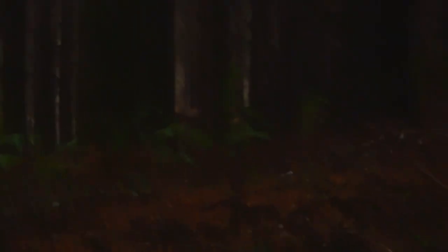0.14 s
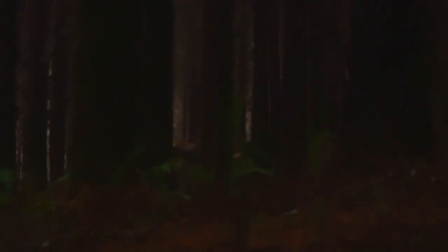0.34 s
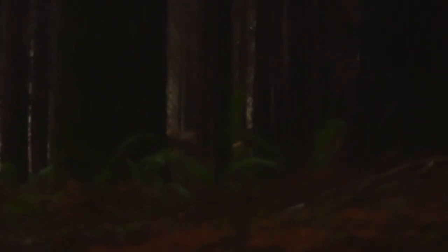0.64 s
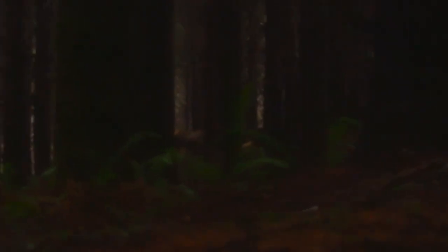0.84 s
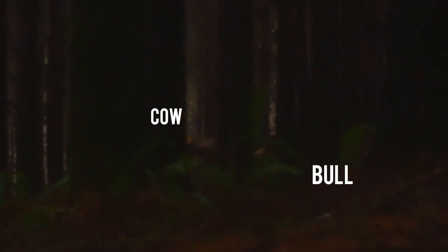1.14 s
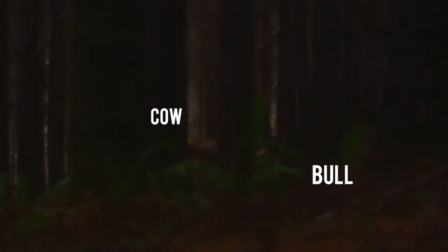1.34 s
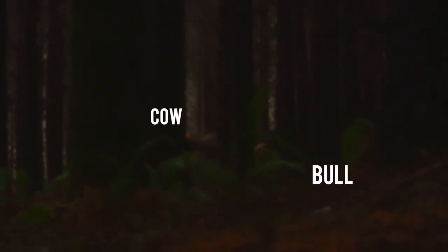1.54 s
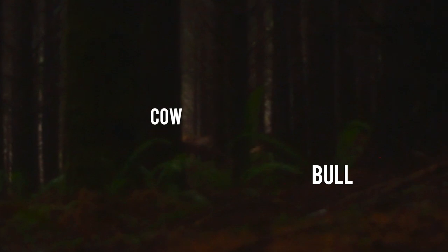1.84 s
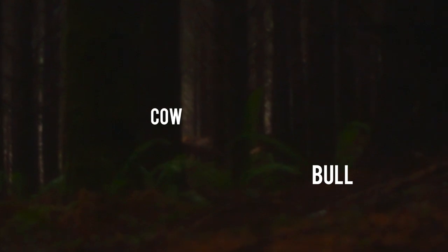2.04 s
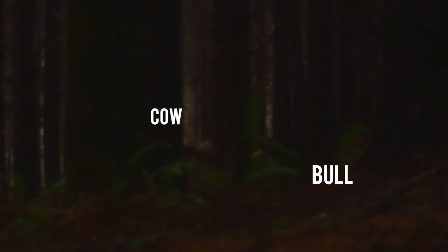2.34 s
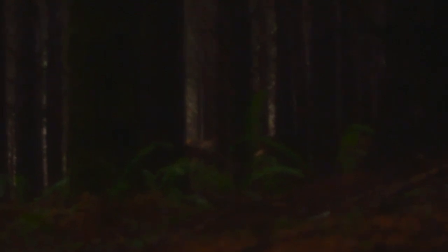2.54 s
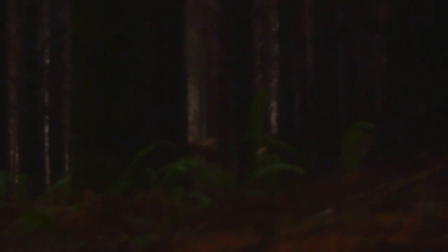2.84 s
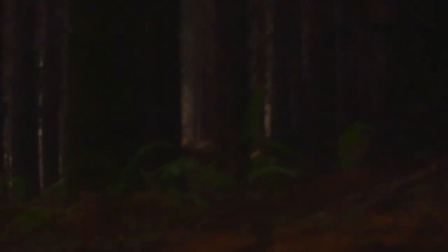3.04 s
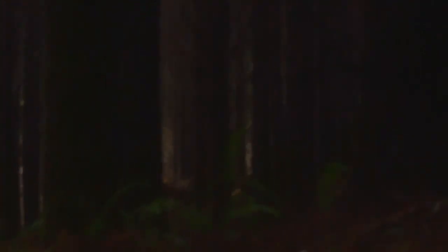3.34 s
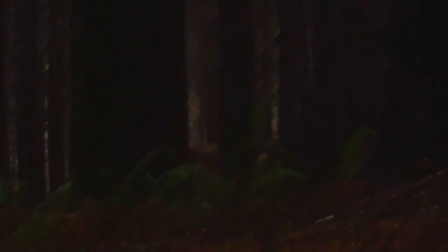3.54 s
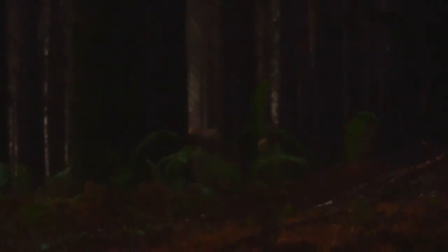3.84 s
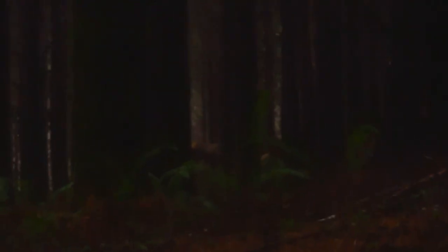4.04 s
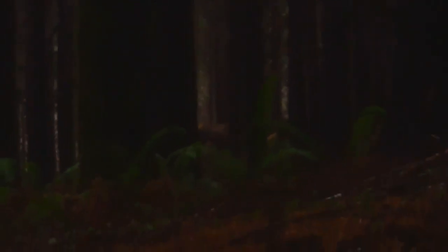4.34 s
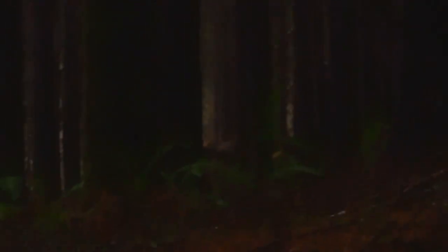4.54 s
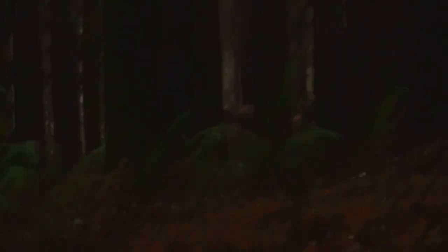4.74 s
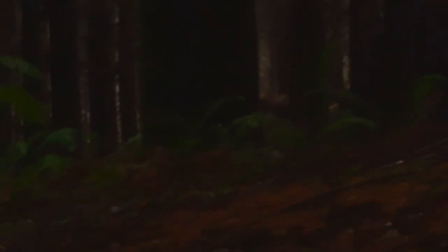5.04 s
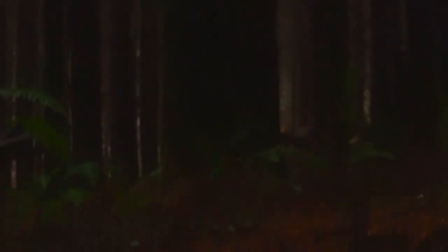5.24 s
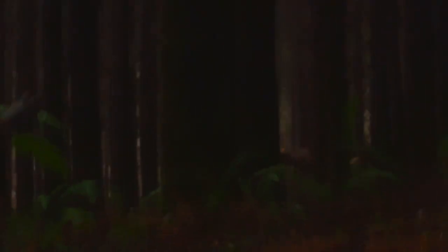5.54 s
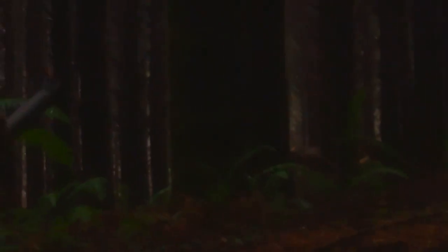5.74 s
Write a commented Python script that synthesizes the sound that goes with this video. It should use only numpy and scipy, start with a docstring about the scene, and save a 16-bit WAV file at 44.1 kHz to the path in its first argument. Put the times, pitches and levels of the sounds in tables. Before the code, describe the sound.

Close, irregular raindrops tap on clothing and tick on the forest floor throughout, with farther rain blurring into a gentle hiss. The hand holding the microphone adds a low, wavering rumble and one soft thump just after the start. Cloth rustles faintly a few times and a thin, high bird whistle barely comes through midway, while the patter continues evenly among the trees.

```python
"""Light rain in a conifer forest, heard from a hand-held camera. From the start, drops pat on a jacket
and tick brightly close by over the hiss of far rain, while the trembling hand makes the microphone rumble.
Almost at once cloth rustles and a wet strap squeaks, and at 0.65 s the camera takes one hard bump among
several faint ones. The cloth rustles again near 1.2 s, a small bird whistles thinly from 2 s,
and a last rustle comes near 3 s. The rain goes on to the end."""
import sys
import numpy as np
from scipy import signal
from scipy.fft import rfft, irfft, next_fast_len
from scipy.io import wavfile
from scipy.ndimage import uniform_filter1d, map_coordinates

SR = 44100
rng = np.random.default_rng(int(sys.argv[2]) if len(sys.argv) > 2 else 0)


def inscribe(sig):
    """Save sig as 16-bit PCM at rate SR to the path in sys.argv[1].

    A 1-D sig is mono; a 2-D sig holds one channel per row.
    Samples are clipped to [-1, 1] before scaling.
    """
    pcm = np.round(np.clip(np.atleast_2d(sig).T, -1, 1) * 32767)
    wavfile.write(sys.argv[1], SR, pcm.astype(np.int16))


N = 259299


def jacket_pats():
    """Dull pats of only a few vibrations each, nearly all from drops landing on cloth."""
    # The loudest pats; the three between 0.14 and 0.2 s are short catches in the strap's squeak.
    # Each row: start in seconds, level in dB, pitch in Hz, seconds to fade by 60 dB.
    big_pats = [(.0937, -21.5, 1330, 0.0083), (.1443, -36, 1435, .015), (.1792, -32, 1316, .03),
                (.1903, -27.5, 1330, 0.013), (.3022, -39, 1150, 0.011), (.3156, -40, 700, .019),
                (.3967, -32, 670, .0044), (.4584, -41, 950, .011), (.5737, -33, 760, 0.0084),
                (.6493, -28, 453, 0.018), (.6536, -35, 940, .0075), (.6727, -34.5, 1015, .017),
                (.9479, -27.5, 1220, 0.0032), (1.0113, -32, 2090, 0.0026), (1.1111, -38, 1180, 0.0057),
                (1.1348, -25, 2050, 0.0032), (1.177, -23.5, 2010, 0.0032), (1.1869, -35, 1170, 0.0076),
                (1.2038, -26, 2000, 0.0042), (1.2732, -20, 790, 0.0055), (1.2993, -34, 1160, .009),
                (1.3195, -18.5, 930, 0.0017), (1.3332, -19, 1090, 0.0029), (1.3776, -33.5, 1560, 0.0037),
                (1.4659, -35, 960, 0.0065), (1.591, -32, 1990, 0.0026), (1.6699, -18, 763, 0.0056),
                (1.7379, -38, 2130, .01), (1.7545, -17, 1276, 0.0018), (2.0345, -29, 800, 0.0041),
                (2.0651, -35, 2340, 0.004), (2.1094, -35, 1130, .0063), (2.169, -28.5, 725, 0.0092),
                (2.1788, -31.5, 1390, 0.0073), (2.2468, -33, 790, .0077), (2.29, -26.5, 800, 0.006),
                (2.5932, -31.5, 1860, 0.0025), (2.653, -34, 620, 0.0066), (2.6692, -30.5, 1300, 0.0016),
                (2.8656, -32.5, 1160, .0054), (2.8876, -32.5, 390, .011), (2.9362, -33.5, 940, 0.01),
                (2.9647, -33, 1015, 0.0035), (2.9808, -28.5, 1110, 0.0089), (2.9925, -20.5, 894, 0.0057),
                (3.0879, -28, 1230, 0.0065), (3.2837, -30.5, 1740, 0.0032), (3.3274, -32, 1040, 0.007),
                (3.3835, -30.5, 900, 0.0053), (3.4499, -26, 970, .0051), (3.4807, -29, 1270, 0.0041),
                (3.62, -34.5, 1473, 0.0078), (3.6356, -25, 1130, 0.0014), (3.7014, -29, 654, 0.0042),
                (3.9354, -32.5, 1230, 0.0083), (3.9794, -26, 2160, 0.00096), (3.9975, -21.5, 880, 0.0051),
                (4.1268, -28, 790, 0.0036), (4.1562, -32, 890, .0039), (4.2105, -22, 1110, 0.004),
                (4.3288, -36.5, 685, 0.011), (4.3552, -33.5, 1020, 0.0067), (4.4085, -35.5, 1090, 0.0043),
                (4.4489, -32.5, 1170, 0.016), (4.5392, -29.5, 840, 0.0061), (4.6127, -22.5, 1040, 0.0033),
                (4.6252, -25.5, 773, 0.007), (4.7818, -23.5, 1090, 0.0062), (4.8804, -40, 1610, .009),
                (4.9052, -31, 2200, 0.0049), (5.158, -31.5, 1040, .004), (5.2222, -28, 840, .0046),
                (5.5642, -25.5, 960, 0.0094), (5.6335, -22, 836, 0.0025), (5.7869, -34.5, 1550, 0.0048)]
    small_pats = shower(count=750, db=-52, spread_db=4.5, hz=1132, octaves=0.9, cycles=2.8)
    pats = taps(np.vstack([big_pats, small_pats]), samples=900, sag=0.14, rise_cycles=0.088,
                looseness=0.8, splash_db=-11, splash_s=0.023)
    return band_limited(pats, low_hz=173, high_hz=10200)


def bright_ticks():
    """Short, bright ticks of raindrops, some alone and some the sharp top of a pat."""
    # The loudest ticks. Each row: start in seconds, level in dB, pitch in Hz.
    loud_ticks = [(0.095, -36.5, 5340), (.2612, -35, 6800), (.3024, -26.5, 4930), (.355, -35, 4520),
                  (0.3987, -32.5, 7300), (0.5738, -21.5, 7380), (.6373, -26.5, 5930), (.7013, -32, 7000),
                  (.7099, -35.5, 10290), (0.7499, -27, 6800), (.7646, -30.5, 8300), (0.7974, -29.5, 8200),
                  (0.866, -25.5, 8900), (1.0113, -26, 5040), (1.1236, -34, 7400), (1.187, -25.5, 12000),
                  (1.2917, -25, 6400), (1.3185, -22, 4130), (1.3772, -28.5, 6470), (1.4547, -30, 10000),
                  (1.4653, -30, 8350), (1.4772, -21.5, 8800), (1.5328, -26.5, 8900), (1.6765, -32.5, 6900),
                  (1.7375, -35, 8170), (1.7545, -27, 4120), (1.8467, -33, 7990), (1.9, -30.5, 7820),
                  (2.109, -29.5, 8540), (2.158, -26, 10200), (2.1793, -26, 5480), (2.1843, -33, 9030),
                  (2.2207, -33, 6600), (2.2882, -30.5, 10720), (2.3389, -24.5, 6170), (2.35, -32, 8150),
                  (2.3748, -31, 9500), (2.4678, -31.5, 8600), (2.5404, -32.5, 7900), (2.5933, -25.5, 7100),
                  (2.6532, -28, 6460), (2.6627, -30, 6500), (2.67, -22, 7520), (2.9003, -33, 9140),
                  (2.9256, -28, 9040), (2.9808, -32.5, 6600), (2.9928, -32, 5540), (3.0098, -28, 11800),
                  (3.0614, -26, 5830), (3.136, -25, 8400), (3.2723, -29, 8450), (3.3132, -28, 11100),
                  (3.3303, -31.5, 9240), (3.4594, -29.5, 11700), (3.502, -26.5, 10400),
                  (3.5204, -34, 10400), (3.5749, -34, 9800), (3.6194, -33, 9370), (3.6911, -30, 7860),
                  (3.7475, -27, 10800), (3.895, -27, 10600), (3.9354, -26, 10200), (3.9793, -29, 4840),
                  (3.9981, -29, 7500), (4.1196, -26, 9660), (4.1272, -27.5, 8650), (4.1537, -29, 7770),
                  (4.1757, -28.5, 6920), (4.1977, -33.5, 9000), (4.3285, -28, 9800), (4.3541, -32.5, 8240),
                  (4.539, -24.5, 6960), (4.5488, -37, 7900), (4.5809, -29.5, 8800), (4.7112, -31, 7500),
                  (4.733, -38, 9100), (4.7613, -31, 10430), (4.7828, -45, 4900), (4.905, -26.5, 5120),
                  (4.9343, -32, 9200), (5.0333, -23.5, 8600), (5.0901, -28, 9200), (5.158, -29.5, 6460),
                  (5.2217, -34, 4660), (5.369, -25, 10530), (5.458, -34, 6850), (5.5644, -33, 6770),
                  (5.7492, -35, 8550), (5.787, -26.5, 7370), (5.8347, -34, 10300)]
    contact_s, ring_cycles = 0.0017, 12  # a tick rings this many cycles beyond the shortest contact
    big_ticks = [(s, db, hz, contact_s + ring_cycles / hz) for s, db, hz in loud_ticks]
    small_ticks = shower(count=1800, db=-50.5, spread_db=3.5, hz=7500, octaves=0.6, cycles=13.4)
    ticks = taps(np.vstack([big_ticks, small_ticks]), samples=600, sag=0.034, rise_cycles=0.83,
                 looseness=2.07, splash_db=-13.5, splash_s=0.026)
    return band_limited(ticks, low_hz=1340, high_hz=19900)


def shower(count, db, spread_db, hz, octaves, cycles):
    """Rows for many small drops that fall at random moments; the louder ones are rare."""
    moment, chance = rng.random((count, 2)).T
    level_db = db - spread_db * np.log(chance * 0.84 + 0.023)
    pitch = np.clip(hz * 2 ** (octaves * rng.standard_normal(count)), 150, 15000)
    fade_s = cycles / pitch + 0.0037
    return np.column_stack([moment * N / SR, level_db, pitch, fade_s])


def taps(rows, samples, sag, rise_cycles, looseness, splash_db, splash_s):
    """Each pat or tick rings briefly at an unsteady pitch and trails off in a splashy scatter."""
    start_s, db, hz, fade_s = np.transpose(rows)[:, :, None]
    t = np.arange(samples) / SR
    jitter = uniform_filter1d(rng.standard_normal((len(rows), 2, samples)), size=3)
    wander = np.cumsum(jitter, axis=2) * np.sqrt(hz / SR)[:, None]
    cycles = (1 - sag) * hz * t + sag * (1 - np.exp(-2 * hz * t))  # pitch sags as the contact spreads
    ring = np.sin(2 * np.pi * cycles + looseness * wander[:, 0])
    ring *= amp(-60 * t / np.clip(fade_s, 1e-3, 1))
    ring *= 1 - np.exp(-t * hz / rise_cycles)
    ring /= np.abs(ring).max(axis=1, keepdims=True)
    splash = np.sin(2 * np.pi * hz * t + 2.6 * wander[:, 1])
    splash *= amp(splash_db - 60 * t / splash_s) * (1 - np.exp(-t / 0.00014))
    positions = np.round(start_s * SR).astype(int) + np.arange(samples)
    return np.bincount(positions.ravel(), (amp(db) * (ring + splash)).ravel(), N + samples)[:N]


def band_limited(x, low_hz, high_hz):
    """Pats and ticks keep little sound below low_hz, and their treble softens above high_hz."""
    return filtered(x, lambda f: (1j * f / (low_hz + 1j * f)) ** 2 / (1 + 1j * f / high_hz))


def far_rain():
    """Countless drops blur into a fluttering hiss; heavier rain swells its low part most."""
    # How hard it rains. Each row: time in seconds, relative strength in dB.
    strength = [(0.0, -51), (0.26, -46), (0.62, -49), (2.05, -51), (2.24, -48), (2.6, -50), (4.05, -49),
                (4.13, -51), (4.91, -50), (5.88, -50)]
    # The rain's low wash and its high hiss. Each row: frequency in Hz, relative level in dB.
    wash_colour = [(35, -41), (60, -9), (81, -21), (102, -16.5), (367, -25.5), (935, -28.5), (2500, -33.5),
                   (3250, -57), (5500, -120)]
    hiss_colour = [(1200, 6), (2000, -2.5), (3000, 6), (4500, 1.5), (8400, 2.5), (10500, -6.5), (13000, -4),
                   (15000, -15), (15900, -9)]
    rain_db, = curves(strength)
    swell_db = rain_db - rain_db.mean()
    wash = amp(-52 + 1.4 * swell_db + 1.08 * wobble(12)) * noise(wash_colour)
    hiss = amp(-55.5 + 0.68 * swell_db + 0.31 * wobble(25)) * noise(hiss_colour)
    return wash + hiss


def hand_rumble():
    """The hand sways slowly and trembles fast, shaking the microphone into a deep rumble."""
    # How much the hand shakes. Each row: time in seconds, sway level in dB, tremor level in dB.
    shaking = [(0.0, -36.5, -27.5), (0.62, -24, -33), (0.65, -23.5, -43), (0.87, -35.5, -31),
               (0.93, -21, -32), (2.36, -33.5, -35.5), (2.39, -29, -24.5), (2.5, -20, -32),
               (2.93, -42, -34.5), (3.01, -31, -28.5), (3.72, -21, -36.5), (3.85, -41, -29),
               (3.96, -24, -35), (4.81, -33.5, -26), (5.01, -23.5, -23.5), (5.62, -25.5, -36.5),
               (5.83, -22, -24), (5.88, -19, -33)]
    # The slow sway and the fast tremor. Each row: frequency in Hz, relative level in dB.
    sway_colour = [(4, -42), (8, -11.5), (14, 3), (20, -4.5), (24, -54)]
    tremor_colour = [(17, -24), (21, 0), (27, -1), (33, -3), (39, -9), (47, -19), (56, -30), (75, -40)]
    sway_db, tremor_db = curves(shaking)
    return amp(sway_db) * noise(sway_colour) + amp(tremor_db) * noise(tremor_colour)


def camera_bumps():
    """Each bump rings the camera's soft grip until the hand abruptly damps it."""
    # Knocks on the camera body. Each row: start in seconds, peak level in dB, pitch in Hz.
    bumps = [(0.2444, -37, 143), (0.309, -42, 132), (.329, -41, 200), (.398, -44, 149), (0.651, -9, 106.6),
             (2.887, -34, 145), (3.608, -41, 124), (3.697, -44, 173), (4.3, -37, 184), (4.989, -41, 115),
             (5.511, -36.5, 107)]
    out, t = np.zeros(N), np.arange(SR // 8) / SR
    for start_s, db, hz in bumps:
        ring_cycles = 6.7 * max(1 + 0.0097 * db, 0.2)  # weaker blows die away in fewer cycles
        swell = (1 - np.exp(-t * hz / 0.39)) * amp(-60 * (t * hz / ring_cycles) ** 1.55)
        i = round(start_s * SR)
        out[i:i + len(t)] -= amp(db) * swell / swell.max() * np.sin(2 * np.pi * hz * t)
    return out


def cloth_rustle():
    """Rubbing fibres slip in clumps and make a fold of cloth sound; each rub swells and fades."""
    # The rubs. Each row: peak time in seconds, level in dB, strongest frequency in Hz, length in seconds.
    rubs = [(0.17, -48.5, 1240, 0.098), (1.196, -48, 1950, 0.12), (2.986, -44, 1010, .05)]
    rise_share, ends_db = 0.55, -19  # share of a rub spent swelling; its two ends against its peak
    out, t = np.zeros(N), np.arange(N) / SR
    for peak_s, db, hz, length_s in rubs:
        from_peak = np.maximum((peak_s - t) / rise_share, (t - peak_s) / (1 - rise_share)) / length_s
        fold = noise([(250, -35), (hz, 0), (hz * 2.7, -8), (7000, -30)])
        clumps = amp(4 * wobble(150))
        out += amp(db + ends_db * from_peak) * unit(fold * clumps)
    return out


def strap_squeak():
    """A wet strap squeaks as it slides."""
    # The path of the squeak. Each row: time in seconds, pitch in Hz, level in dB.
    squeak = [(.155, 1150, -70), (.167, 1110, -37), (.176, 1173, -53), (.192, 1243, -42), (.21, 1185, -71),
              (.23, 1045, -48), (.242, 900, -68), (.262, 762, -53.5), (.3, 710, -64)]
    return whistle(squeak, waver_hz=108, waver_rate=260, flutter_db=5.5)


def bird():
    """A small bird gives a thin, trilled whistle; the tree trunks smear it with their echoes."""
    # The path of the call. Each row: time in seconds, pitch in Hz, relative level in dB.
    tune = [(2.0, 8750, -78), (2.06, 8530, -65), (2.17, 8100, -64), (2.24, 8050, -65), (2.31, 7970, -58),
            (2.43, 8120, -65), (2.56, 7800, -86)]
    call = whistle(tune, waver_hz=165.6, waver_rate=160, flutter_db=6.0)
    t = np.arange(SR // 6) / SR
    trunks = rng.standard_normal(len(t)) * amp(-60 * t / 0.34)
    echoes = signal.fftconvolve(call, trunks / np.linalg.norm(trunks))[:N]
    return 0.61 * call + 1.2 * echoes


def whistle(rows, waver_hz, waver_rate, flutter_db):
    """An unsteady tone that follows rows of time, pitch and level, and is silent outside them."""
    hz, db = curves(rows)
    t = np.arange(N) / SR
    phase = 2 * np.pi * np.cumsum(hz + waver_hz * wobble(waver_rate)) / SR
    sounding = (t > rows[0][0]) & (t < rows[-1][0])
    return np.sqrt(2) * amp(db + flutter_db * wobble(90)) * np.sin(phase) * sounding


def noise(colour):
    """Noise of average power 1, shaped by rows of frequency in Hz and relative level in dB."""
    hz, db = np.transpose(colour)
    gain = lambda f: amp(np.interp(np.log(f + 1), np.log(hz + 1), db, -120, -120))
    return unit(filtered(rng.standard_normal(N), gain))


def filtered(x, response):
    """Turn each frequency of x up or down as the response function says."""
    size = next_fast_len(N + SR // 2)
    return irfft(rfft(x, size) * response(np.fft.rfftfreq(size, 1 / SR)), size)[..., :N]


def wobble(rate):
    """A smooth curve through random values, rate of them each second."""
    return map_coordinates(rng.standard_normal(int(N * rate / SR) + 4), [np.arange(N) * rate / SR])


def curves(rows):
    """Join the rows with straight lines: one curve for each column after the time."""
    times, *columns = np.transpose(rows)
    return [np.interp(np.arange(N) / SR, times, column) for column in columns]


def amp(db):
    """Turn decibels into a factor to multiply by."""
    return 10 ** (np.asarray(db) / 20)


def unit(x):
    """Scale x to an average power of 1."""
    return x / np.sqrt(np.mean(x ** 2) + 1e-20)


def scene():
    """Add the rain, the handling sounds and the bird into one channel."""
    rain = jacket_pats() + bright_ticks() + far_rain()
    handling = hand_rumble() + camera_bumps() + cloth_rustle() + strap_squeak()
    return (rain + handling + bird())[None]


def record(dry):
    """The camera keeps nothing above 15950 Hz."""
    return filtered(dry, lambda hz: hz < 15950)


dry = scene()
out = record(dry)
inscribe(out)
```